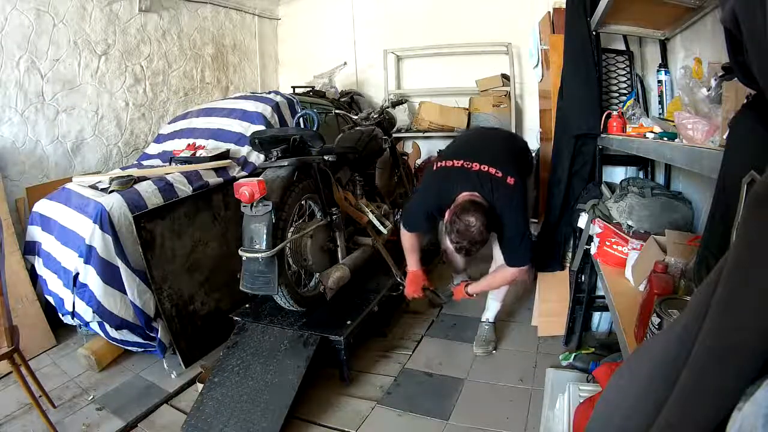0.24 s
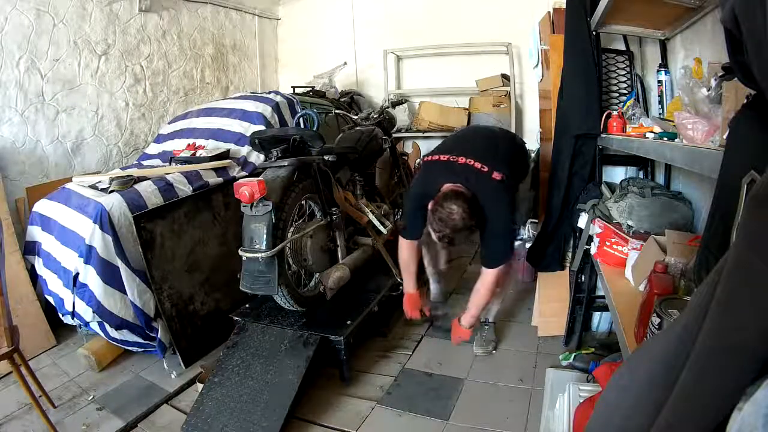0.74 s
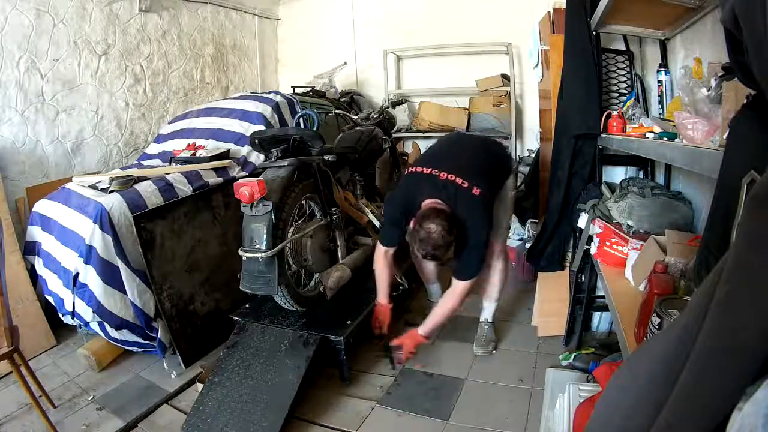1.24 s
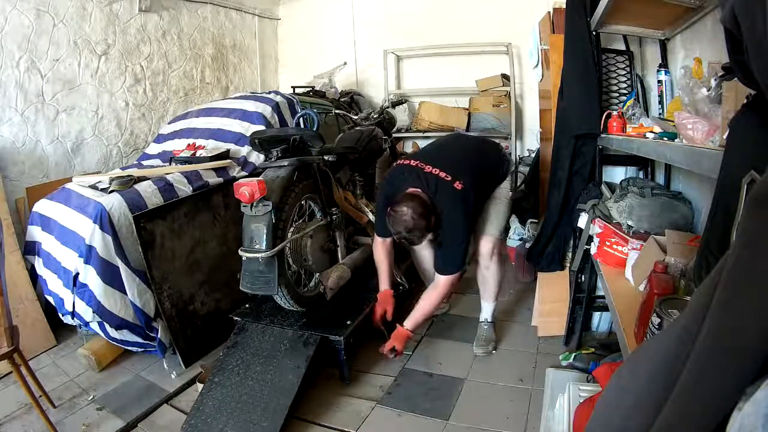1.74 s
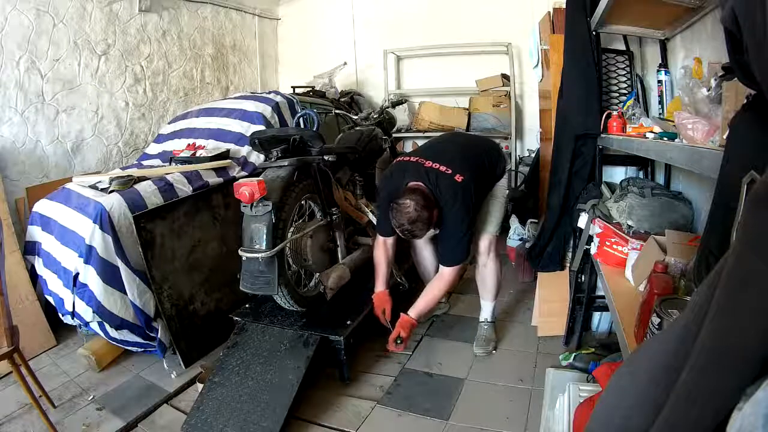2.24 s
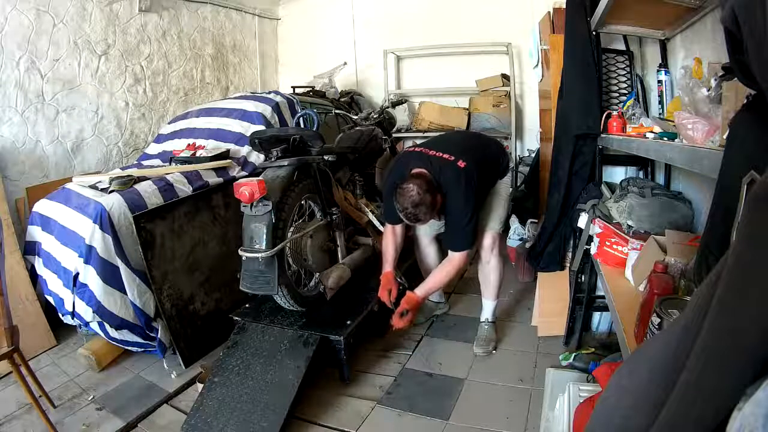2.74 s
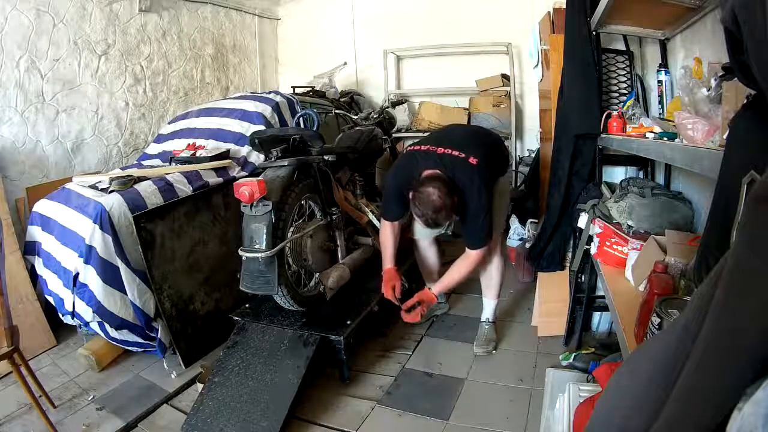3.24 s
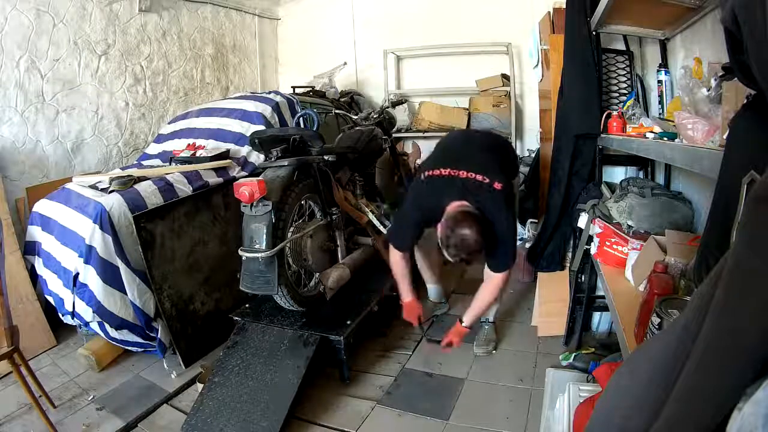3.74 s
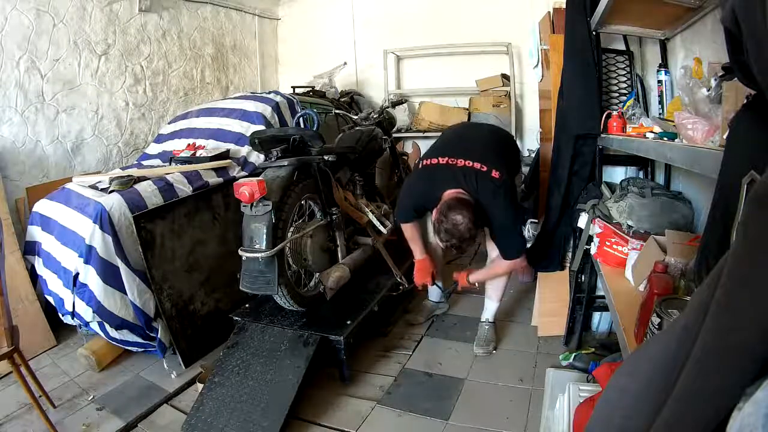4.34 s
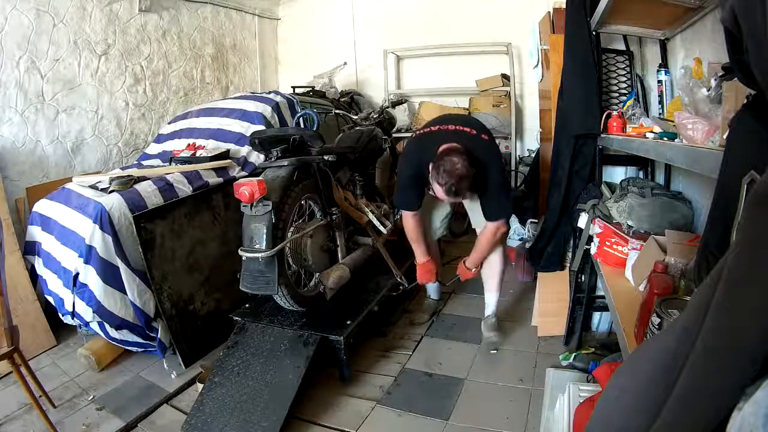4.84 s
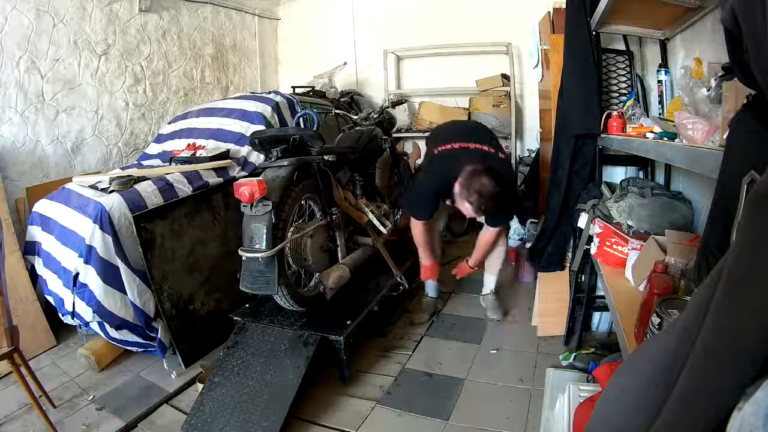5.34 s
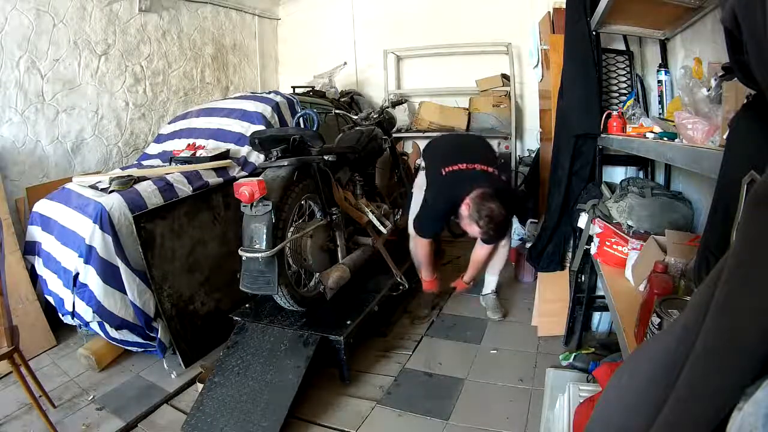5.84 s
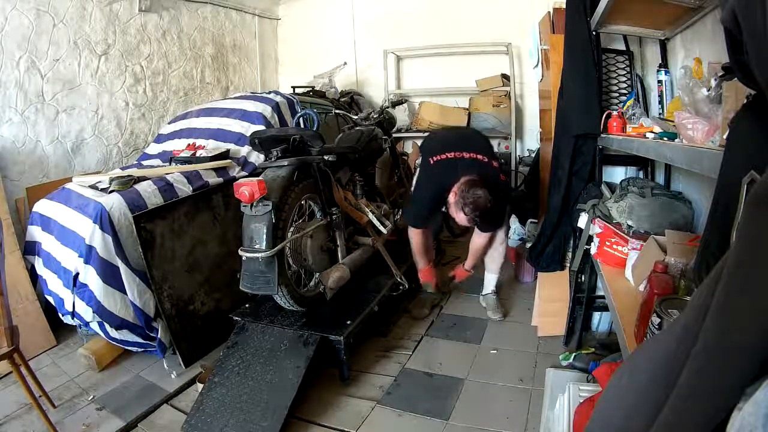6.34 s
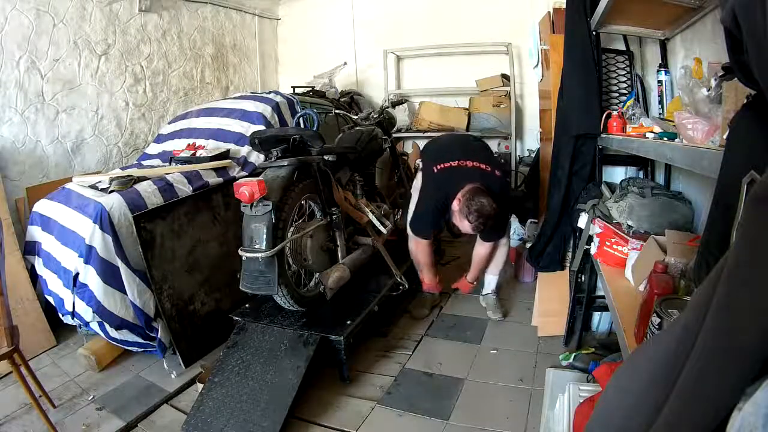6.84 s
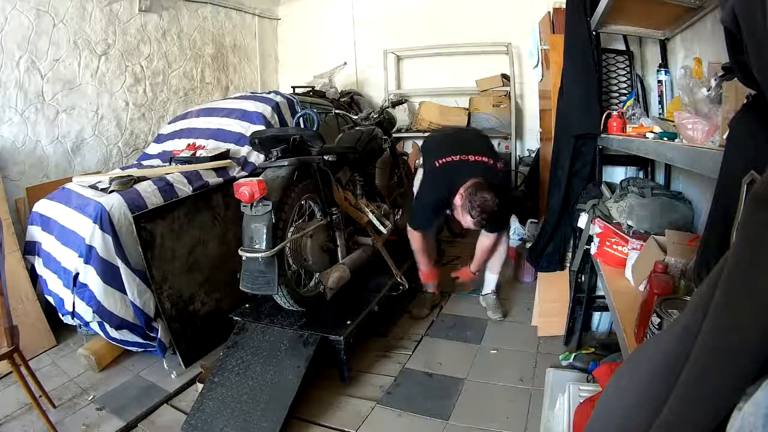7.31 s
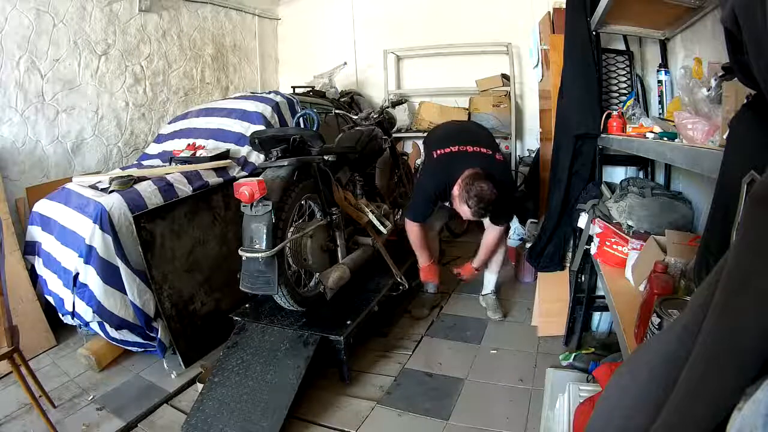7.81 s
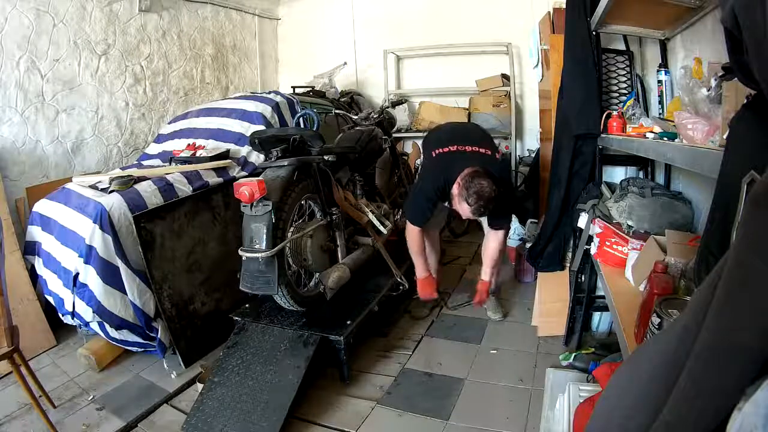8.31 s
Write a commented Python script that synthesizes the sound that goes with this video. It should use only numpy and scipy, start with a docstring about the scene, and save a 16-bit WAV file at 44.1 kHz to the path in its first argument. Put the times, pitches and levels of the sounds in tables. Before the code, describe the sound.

Metal clanks, clicks and dull thuds from a steel lift being worked by hand, echoing in a concrete garage.

```python
"""A concrete garage, with a camera microphone standing well back from a hand-worked steel lift.
Blows set the frame's modes thudding and clanking; a bar, a catch and a small pin ring on their own.
At this distance most of each blow arrives off the walls. Low shuffling and a steady rumble fill
the gaps, and the camera adds its hiss."""
import sys
import numpy as np
from scipy import signal
from scipy.fft import rfft, irfft, next_fast_len
from scipy.io import wavfile
from scipy.ndimage import map_coordinates

SR = 44100
rng = np.random.default_rng(int(sys.argv[2]) if len(sys.argv) > 2 else 0)


def unload_wav(signal):
    """Save mono or channel-first audio to the path in sys.argv[1] as 16-bit WAV at rate SR, clipped to [-1, 1]."""
    wavfile.write(
        sys.argv[1],
        SR,
        np.round(np.clip(np.atleast_2d(signal).T, -1, 1) * 32767).astype(np.int16),
    )


N = 377964
SIZE = 2 ** 15  # samples given to one blow or ring

# How long the concrete walls reverberate. Each row: frequency in Hz, t60 in seconds.
GARAGE_T60 = [(150, 0.55), (400, 0.65), (1000, 0.44), (2500, 0.42), (5000, 0.27), (9000, 0.15)]
# Colours of the background noises. Each row: frequency in Hz, relative spectral density in dB.
RUMBLE_SPECTRUM = [(1, 21), (4, 10), (10, -7), (30, -10), (60, 1.5), (110, -4), (170, -29), (300, -120)]
SHUFFLE_SPECTRUM = [(65, -45), (110, -18), (176, -6), (206, -1.5), (293, -2.5), (396, -4.5), (451, -11.5),
                    (914, -20), (1520, -20.5), (2110, -26), (2500, -30.5), (3250, -59), (5500, -120)]
HISS_SPECTRUM = [(410, -1), (700, -3.5), (944, -25.5), (2670, -9), (5060, -12), (8080, -19), (13900, -6.5),
                 (14900, -7), (15700, -18)]
# Modes of the loose parts. Each row: frequency in Hz, relative level in dB, t60 in seconds.
PIN_MODES = [(4980, -6.5, 0.26), (5020, -8.5, 0.2), (5060, 1.5, 0.089)]
BAR_MODES = [(1156, 0.5, 0.34), (1104, -20, 0.8), (2530, -8, 0.3)]
CATCH_MODES = [(5850, -13, 0.11), (6600, -12, 0.058), (6570, 2, 0.026), (6740, -15, 0.22), (7100, -18, 0.2),
               (8670, -18, 0.09)]
# Strikes on the loose parts. Each row: start in seconds, gain in dB.
PIN_HITS = [(0.9238, -66), (1.0425, -44), (1.1074, -39.5), (1.3379, -46.5), (1.953, -47.5), (1.9824, -49),
            (3.8452, -52), (4.156, -45.5), (7.43, -62)]
BAR_HITS = [(1.0425, -45), (1.1894, -46.5), (1.3387, -34.5), (1.3924, -35.5), (2.0685, -48), (3.5717, -62),
            (3.8457, -41.5), (7.43, -57.5)]
CATCH_HITS = [(1.0434, -41), (1.953, -61), (1.9812, -39), (2.0683, -44)]
# Modes of the steel frame. Each row: frequency in Hz, width in Hz, relative level in dB.
FRAME_MODES = [(168, 19.5, 3.5), (214.2, 9.2, 11.5), (245.3, 14.3, 9.5), (285, 11.5, 0.5), (362.7, 19.3, 5),
               (498, 33, -6.5), (548.5, 40, -6), (670.5, 43, -9), (776, 32, -3), (896, 28, -0.5),
               (965, 19, -5.5), (1102, 55, -3.5), (1236, 125, -4.5), (1530, 40, -9.5), (1658, 21, -5.5),
               (1770, 37, -8), (1920, 17, -7.5), (2073, 58, -11), (2190, 63, -10), (2440, 68, -7.5),
               (2610, 13, 0), (2848, 56, -4), (3235, 72, -11.5), (3600, 51, -5.5), (4030, 44, -4.5),
               (4250, 31, -6), (4620, 56, -14)]
# Blows on the frame. Each row: start in seconds, relative clank level in dB, then low thud, mid body
# and hard edge in dB over the clank, and the struck member's frequency in Hz.
FRAME_BLOWS = [(0.05, -59.5, 6, 5, -16, 2210), (0.2461, -48, -4, -8.5, -26, 910),
               (0.327, -52.5, 2, -2, -18, 2090), (0.7596, -57, 22, 7.5, -24, 660),
               (0.7846, -58, 11, 3.5, -17, 1010), (0.9225, -52, -9, -12, -18, 880),
               (0.9582, -50, 11, -8, -10, 850), (1.0471, -30.5, -4.5, -0.5, -2.5, 2370),
               (1.095, -33.5, 1, -7, -4, 1030), (1.3364, -25.5, -9.5, -23, -14, 1170),
               (1.3938, -35, -1, -5, -11, 1120), (1.6576, -53.5, 6.5, -5, -13, 1750),
               (1.7403, -49.5, -2, -13, -23, 1330), (1.8063, -37, -7, -4, -10.5, 910),
               (1.9523, -34, -5, -10.5, -3.5, 2320), (1.9829, -26.5, -7.5, -4.5, -8, 1900),
               (2.064, -25.5, -13.5, -5, -10, 1800), (2.6219, -33, -1.5, 1.5, -34.5, 890),
               (2.8253, -35.5, -3.5, 4.5, -36, 760), (2.8425, -39.5, 7, -5, -7.5, 1690),
               (2.9408, -58, 11, 13, -26, 850), (2.9823, -49, 14.5, 13.5, -22, 1060),
               (3.1775, -68.5, 17.5, 16.5, -12, 700), (3.258, -54, -3.5, -1, -10, 1690),
               (3.5722, -53.5, 1.5, -2.5, -8, 1080), (3.782, -59, 9, 2, -6, 721),
               (3.8282, -38.5, -2.5, -19, -14, 890), (3.844, -31, -13, -9, -8.5, 700),
               (4.06, -69, 13, 3, -9, 250), (4.1538, -50.5, 1, -8, -0.5, 1660),
               (4.3982, -35.5, 3, 0, -26, 1170), (4.6373, -57, 3, 3.5, -8, 1530),
               (4.7043, -55, 5, -7, -6, 810), (4.8175, -40, -1, 2.5, -17.5, 1340),
               (5.0288, -57, 15, 6, -21, 720), (5.058, -48.5, 5.5, 2, -16, 1400),
               (5.0935, -47.5, -12, 4, -4, 890), (5.1208, -40, 4.5, 4.5, -16, 1060),
               (5.2367, -53, -1, -4, -31, 1010), (5.335, -68, 12, 4, -10, 370),
               (5.491, -61, 11, 11, -16, 1170), (5.535, -55, 8, 6, -26, 890),
               (5.601, -42.5, 1.5, -3.5, -14.5, 935), (5.6328, -51.5, 5, 2, -25, 380),
               (5.7176, -70, 18, 4, -10, 840), (5.8003, -38.5, 0, -3, -26, 730),
               (6.2165, -67.5, 17, -7, -3, 312), (6.2877, -67.5, 14.5, -8, -10, 302),
               (6.7448, -47.5, -14, -9, -18, 850), (6.851, -47.5, 6, -2.5, -15.5, 732),
               (7.4176, -44.5, -0.5, -8.5, -15, 740), (7.7519, -52, -1, -8, -9, 1180),
               (7.9157, -52, 5.5, -2.5, -12, 1560), (8.0307, -39.5, -17, -8, -10.5, 820),
               (8.0601, -41, -1, 1, -15, 910)]

RUMBLE_DB, SHUFFLE_DB, HISS_DB = -63, -61, -63
SETTLE_DB, SETTLE_RISE_S, SETTLE_T60_S = -9, 0.048, 0.86  # level is against the mean of thud and body
BOOM_SHARE, BOOM_DB = 0.76, -16.5  # the floor booms with this share of the thud's dB, plus an offset
MEMBER_SPREAD = 0.13  # of one member's modes, in log frequency
BAND_LIMIT_HZ = 15820


def amp(db):
    """Decibels to gain."""
    return 10 ** (np.asarray(db) / 20)


def along(points, hz):
    """A curve of (Hz, value) points, read on a log frequency axis."""
    point_hz, values = np.transpose(points)
    return np.interp(np.log(hz + 1), np.log(point_hz + 1), values)


def minimum_phase(gain):
    """The causal, minimum-phase response with this magnitude."""
    cepstrum = irfft(np.log(gain + 1e-6))
    half = len(cepstrum) // 2
    cepstrum[1:half] *= 2
    cepstrum[half + 1:] = 0
    return np.exp(rfft(cepstrum))


def noise(spectrum):
    """Noise of rms 1 with this colour."""
    size = next_fast_len(N)
    colour = amp(along(spectrum, np.fft.rfftfreq(size, 1 / SR)))
    x = irfft(rfft(rng.standard_normal(size)) * colour, size)[:N]
    return x / np.sqrt(np.mean(x ** 2) + 1e-20)


def drift(step_samples):
    """A smooth random curve that passes through a new value at each step."""
    return map_coordinates(rng.standard_normal(N // step_samples + 4), [np.arange(N) / step_samples])


def rumble():
    """Room tone: a steady low rumble under everything."""
    return amp(RUMBLE_DB) * noise(RUMBLE_SPECTRUM)


def garage(direct_db, build_s, knee_s):
    """Lift to microphone: direct sound, then the walls build up and fade by band, faster past a knee."""
    hz, frame_s, bands = signal.stft(rng.standard_normal(SIZE // 2), SR, nperseg=256)
    age = frame_s + 0.91 * np.maximum(frame_s - knee_s, 0)
    decay = amp(-60 * age / along(GARAGE_T60, hz)[:, None])
    tail = signal.istft(bands * decay, SR, nperseg=256)[1]
    t = np.arange(len(tail)) / SR
    near_walls = 1 + 0.17 * np.exp(-t / 0.016)  # the nearest walls answer strongest
    tail = tail * (1 - np.exp(-t / build_s)) * near_walls
    tail /= np.linalg.norm(tail)
    tail[0] = amp(direct_db)
    return rfft(tail, SIZE)


def shuffle_and_settle():
    """Feet and cloth murmur low and unevenly; the frame creeps and settles after each blow."""
    t = np.arange(N) / SR
    power = np.full(N, amp(SHUFFLE_DB) ** 2)
    for start, clank_db, thud_db, body_db, *_ in FRAME_BLOWS:
        age = np.maximum(t - start, 0)
        settle_db = clank_db + (thud_db + body_db) / 2 + SETTLE_DB - 60 * age / SETTLE_T60_S
        power += (amp(settle_db) * (1 - np.exp(-age / SETTLE_RISE_S))) ** 2
    flutter_db = 2.1 * drift(step_samples=2000)
    return np.sqrt(power) * amp(flutter_db) * noise(SHUFFLE_SPECTRUM)


def loose_parts():
    """Pin, bar and catch ring on their own modes; their loudness wavers as the walls answer."""
    out, t = np.zeros(N + SIZE), np.arange(SIZE) / SR
    attack = 1 - np.exp(-t / 0.00066)
    for modes, hits in ((PIN_MODES, PIN_HITS), (BAR_MODES, BAR_HITS), (CATCH_MODES, CATCH_HITS)):
        for start, hit_db in hits:
            waver_db = 2.5 * map_coordinates(rng.standard_normal(64), [t * 60])
            ring = sum(amp(db - 60 * t / t60) * np.sin(2 * np.pi * (hz * t + rng.random()))
                       for hz, db, t60 in modes)
            out[round(start * SR):][:SIZE] += amp(hit_db + waver_db) * attack * ring
    return out[:N]


def frame_resonance(hz, scatter_db):
    """Magnitude response of the steel frame, each mode struck at a new strength."""
    centre, width, db = np.transpose(FRAME_MODES)[:, :, None]
    sign = (-1) ** np.arange(len(FRAME_MODES))[:, None]
    gain = sign * amp(db + scatter_db * rng.standard_normal(db.shape))
    damping = 1j * hz * width
    return np.abs(np.sum(gain * damping / (centre ** 2 - hz ** 2 + damping), axis=0))


def lift():
    """The frame from across the garage: soft blows feed its low modes, hard ones reach the treble."""
    out, hz = np.zeros(N + SIZE), np.fft.rfftfreq(SIZE, 1 / SR)
    for start, clank_db, thud_db, body_db, edge_db, member_hz in FRAME_BLOWS:
        boom_db = BOOM_SHARE * thud_db + BOOM_DB
        contact = [(30, boom_db - 32), (55, boom_db + 7), (95, boom_db + 21),
                   (160, thud_db), (300, thud_db + 8), (750, body_db + 5), (1900, 0),
                   (3800, edge_db), (7500, 1.83 * edge_db - 5.5), (11000, 1.5 * edge_db - 26)]
        # the member under the blow sounds most
        member_db = 7 * np.exp(-(np.log((hz + 1) / member_hz) / MEMBER_SPREAD) ** 2)
        # a dull blow damps the steel it lands on
        ringing = amp(0.25 * edge_db) * frame_resonance(hz, scatter_db=3.5)
        frame = minimum_phase(amp(along(contact, hz) + member_db) * (amp(-12.5) + ringing))
        at_mic = irfft(frame * garage(direct_db=-14.5, build_s=0.0042, knee_s=0.14), SIZE)
        out[round(start * SR):][:SIZE] += amp(clank_db + 37.5) * at_mic
    return out[:N]


def scene():
    """All that reaches the distant microphone, in one channel."""
    return (lift() + loose_parts() + shuffle_and_settle() + rumble())[None]


def record(dry):
    """The camera adds its slightly wavering hiss and keeps nothing above its band limit."""
    size = next_fast_len(N)
    hiss = amp(HISS_DB + 0.5 * drift(step_samples=5000)) * noise(HISS_SPECTRUM)
    passband = np.fft.rfftfreq(size, 1 / SR) < BAND_LIMIT_HZ
    return irfft(rfft(dry + hiss, size) * passband, size)[:, :N]


dry = scene()
out = record(dry)
unload_wav(out)
```